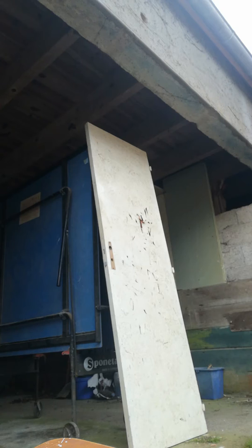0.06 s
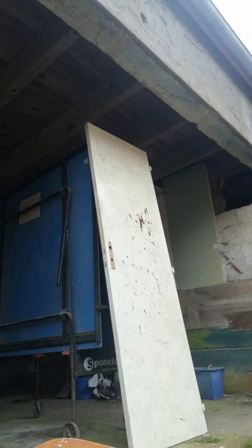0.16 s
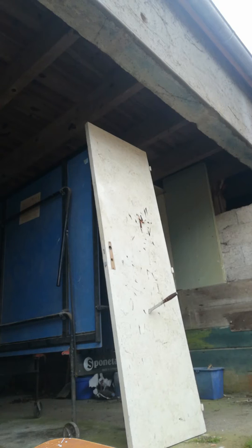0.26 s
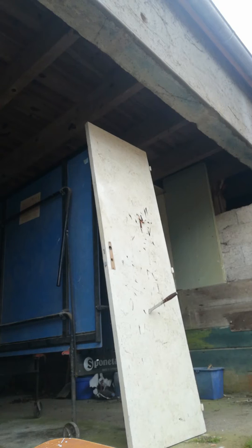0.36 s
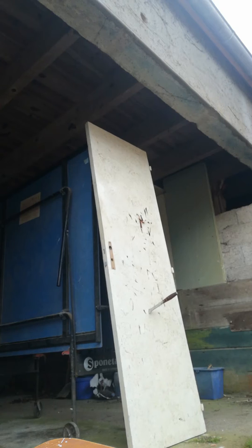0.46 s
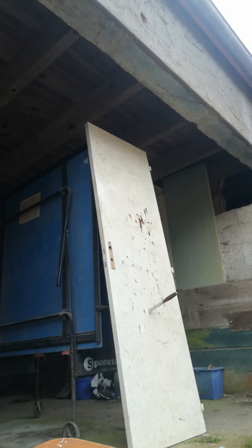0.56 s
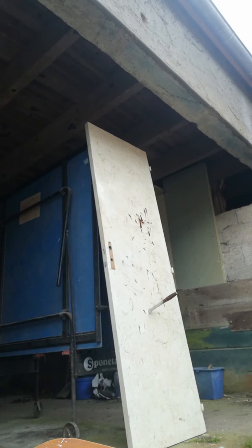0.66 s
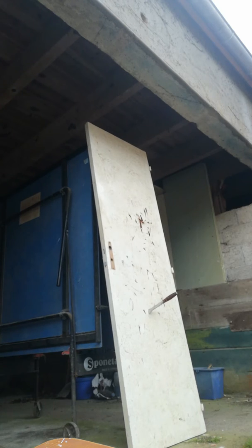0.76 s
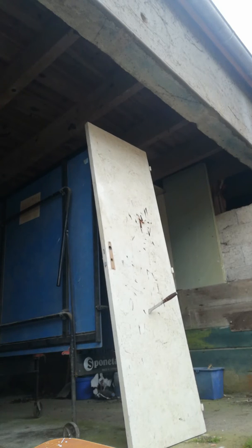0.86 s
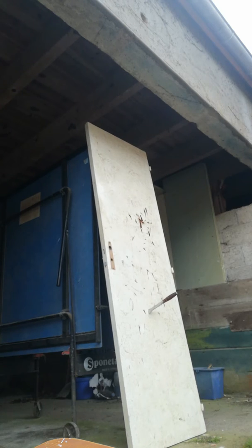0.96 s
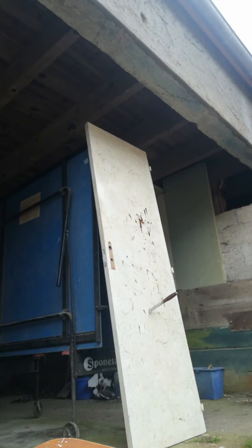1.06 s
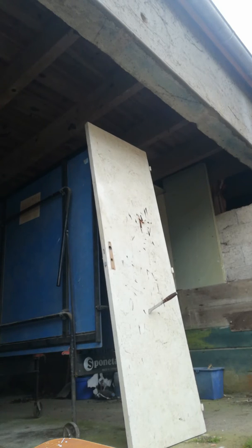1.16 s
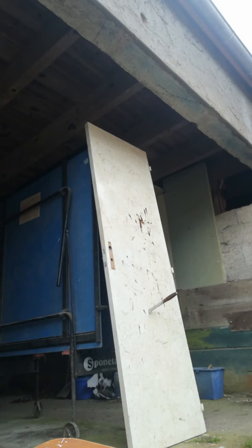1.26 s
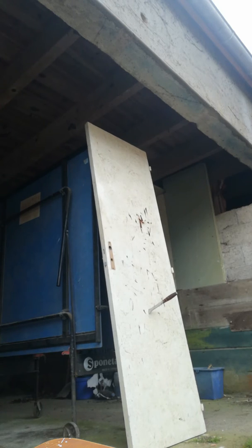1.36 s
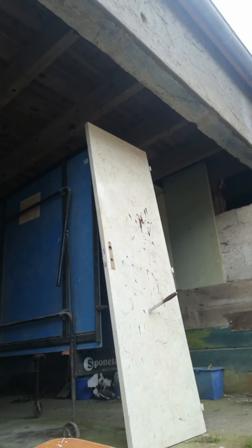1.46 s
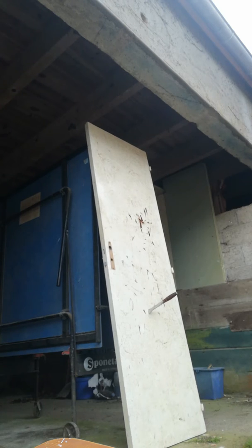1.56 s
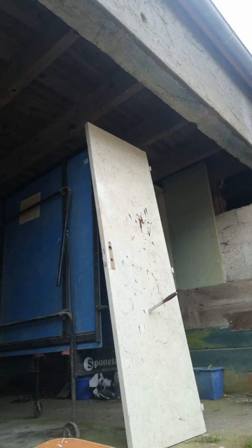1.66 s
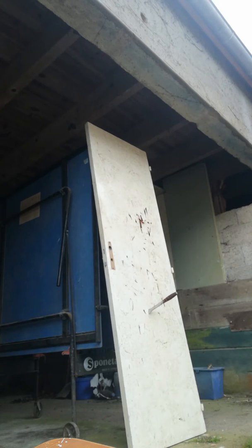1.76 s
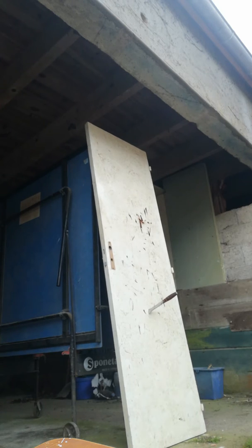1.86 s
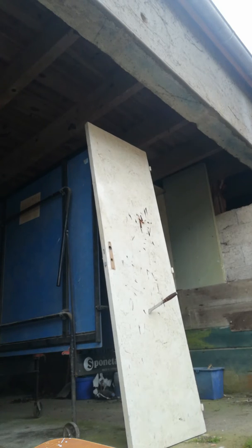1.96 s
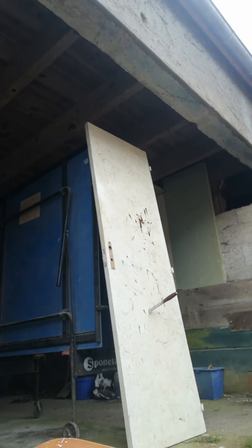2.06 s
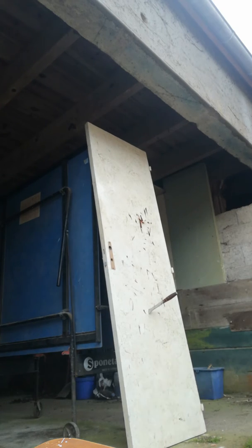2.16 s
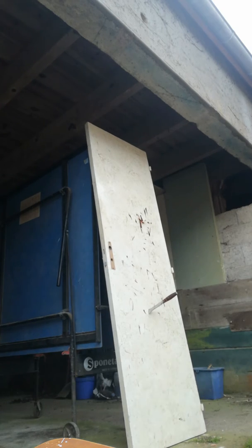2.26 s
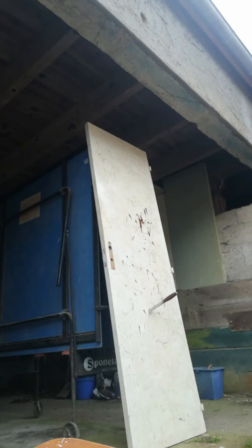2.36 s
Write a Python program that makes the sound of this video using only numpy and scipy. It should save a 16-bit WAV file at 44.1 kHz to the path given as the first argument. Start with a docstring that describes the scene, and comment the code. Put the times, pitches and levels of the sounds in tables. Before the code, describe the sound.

A thrown knife cracks into a hollow wooden door, which booms, knocks and rattles under a shed roof.

```python
"""Knife thrown into a hollow door

A knife sticks into a hollow wooden door leaning under an open shed roof: a noise-burst crack, a deep boom (one
sine with a drawn level) that throbs as the door rocks, knocks of damped modes, and a shed tail of noise dying
band by band. The thrower's sleeve, clothes and feet rustle (swelling noise) with ticks and footfalls (short
sines), the blade rings briefly, and a far engine (wavering harmonics) drones over the yard's hush (noise)."""
import sys
import numpy as np
from scipy import signal
from scipy.io import wavfile
from scipy.ndimage import uniform_filter1d

SR = 44100
rng = np.random.default_rng(int(sys.argv[2]) if len(sys.argv) > 2 else 0)


def waveform_to_disk(signal):
    """Save audio, clipped to [-1, 1], as 16-bit WAV at the path in sys.argv[1]."""
    frames = np.transpose(np.atleast_2d(signal))
    scaled = np.clip(frames, -1, 1) * 32767
    samples = np.round(scaled).astype(np.int16)
    wavfile.write(sys.argv[1], SR, samples)


N = 105840
T = np.arange(N) / SR
HIT_S = 0.2243
NEAR_PAN_DB = -7  # left minus right, ticks and blade
PANEL_SHARE = 0.59  # resonant part of the crack
KNOCK_RISE_S = 0.018

# Balance of the strike and its tail: f/Hz, left minus right/dB
STRIKE_PAN = [(150, 2.5), (400, -3.5), (700, -9), (2400, -5), (5000, 0), (14000, -17.5)]


def amp(db):
    """Amplitude factor of a level in dB."""
    return 10 ** (np.asarray(db, float) / 20)


def evened(x):
    """Scale to rms 1."""
    return x / np.sqrt(np.mean(x ** 2) + 1e-20)


def read(points, hz):
    """Interpolate a table over log frequency."""
    f, value = np.transpose(points)
    return np.interp(np.log(hz + 1), np.log(f + 1), value)


def add(mix, start_s, sound):
    """Mix a sound in at start_s, cut at the end of the scene."""
    part = mix[..., round(start_s * SR):][..., :sound.shape[-1]]
    part += sound[..., :part.shape[-1]]


def noise(spectrum, pan, size=512, patchy_db=1.5, t60=None):
    """Stereo noise from random short-time spectra, rms 1 before any decay; t60 makes each band die away."""
    # Left-right likeness: f/Hz, correlation
    likeness = [(60, 0.99), (240, 0.76), (950, 0.28), (3770, 0.083), (15000, -0.18)]
    hop = size // 4
    frames, hz = N // hop + 5, np.fft.rfftfreq(size, 1 / SR)
    a, b, c, d, patches = rng.standard_normal((frames, len(hz), 5)).T
    patches = uniform_filter1d(patches, size=size // 64, axis=0)
    patches = evened(uniform_filter1d(patches, size=10, axis=1))
    like = np.clip(read(likeness, hz), -1, 1)[:, None]
    side_db = read(pan, hz)[:, None] / 2
    left = a + 1j * b
    right = like * left + np.sqrt(1 - like ** 2) * (c + 1j * d)
    z = np.array([left * amp(side_db), right * amp(-side_db)])
    z *= amp(read(spectrum, hz)[:, None] + patchy_db * patches)
    steady = signal.istft(z, nperseg=size, noverlap=size - hop)[1]
    scale = np.sqrt(np.mean(steady.mean(0) ** 2))  # rms of the mono sum
    if t60:
        z *= amp(-60 * np.arange(frames) * hop / SR / read(t60, hz)[:, None])
    return signal.istft(z, nperseg=size, noverlap=size - hop)[1][:, :N] / scale


def ring(modes, rise_s, phases, sag_per_s=0):
    """Sum of exponentially dying sines with a soft start, sinking in pitch if sag_per_s is set."""
    t = T[:SR // 2]
    out = 0
    for (hz, db, t60_s), phase in zip(modes, phases):
        cycles = hz * t / (1 + sag_per_s * t / 2) + phase
        out = out + amp(db - 60 * t / t60_s) * np.sin(2 * np.pi * cycles)
    return (1 - np.exp(-t / rise_s)) * out


def panel(x, share=PANEL_SHARE):
    """The door's skin as parallel resonators, blended with the direct sound."""
    # Skin resonances: f/Hz, width/Hz, level/dB
    resonances = [(746, 16, -8.5), (919, 74, -7.5), (1048.5, 36, -4), (1147, 150, -3), (1600, 51, -9.5),
                  (1995, 86, -5.5), (2870, 32, -14)]
    rung = sum(amp(db) * signal.lfilter(*signal.iirpeak(hz, hz / width_hz, SR), x)
               for hz, width_hz, db in resonances)
    return (1 - share) * x + share * rung * np.std(x) / np.std(rung)


def hush():
    """Steady background of the yard: shaped noise."""
    # Spectrum: f/Hz, level/dB per Hz
    spectrum = [(20, 0.5), (70, -10.5), (289, -9.5), (630, -22), (1230, -22.5), (2140, -23.5),
                (10500, -25.5), (15400, -38.5)]
    # Balance: f/Hz, left minus right/dB
    pan = [(60, -0.5), (300, -1), (15000, -2.5)]
    return amp(-60.5) * noise(spectrum, pan, size=2048, patchy_db=.7)


def engine():
    """Far engine: multiples of a gliding base frequency, each wavering in level on its own."""
    # Course: t/s, base f/Hz, level/dB
    course = [(.2, 65.94, -68.5), (1.099, 69.1, -63), (1.449, 74.9, -66.5), (2, 77.23, -63),
              (2.251, 73.5, -66), (2.33, 64.7, -63.5)]
    # Multiples from the first up: level/dB
    order_levels = [0.5, 1, -5, -7.5]
    waver_db = 4
    s, hz, level_db = np.transpose(course)
    turns = np.cumsum(np.interp(T, s, hz)) / SR
    out = 0
    for order, db in enumerate(order_levels, 1):
        waver = evened(sum(np.sin(2 * np.pi * (f * T + rng.random())) / np.sqrt(f)
                           for f in np.geomspace(1, 12, num=10)))
        tone = np.sin(2 * np.pi * (order * turns + rng.random()))
        out = out + np.sqrt(2) * amp(db + waver_db * waver) * tone
    return out * amp(np.interp(T, s, level_db))


def rustle():
    """Sleeve, clothes and feet: grainy noise in two bands, swelling and dying with each movement."""
    # Movements: peak t/s, rise/s, t60/s, hiss level/dB, body level/dB
    movements = [(0.052, 0.025, 0.18, -42.5, -51.5), (0.092, 0.026, 1, -58, -52.5),
                 (0.177, 0.0024, 0.18, -47, -43), (.84, 0.1, 1, -59.5, -56.5),
                 (1.068, 0.037, 1, -61.5, -58.5), (1.17, 0.014, .6, -60, -64), (1.265, 0.018, 1, -58, -61),
                 (1.361, 0.097, 0.13, -68, -81), (1.848, 0.011, 0.71, -46.5, -72),
                 (1.902, 0.076, 1, -71, -56.5), (2.35, 0.053, 0.59, -69, -66.5)]
    # Hiss spectrum: f/Hz, level/dB per Hz
    hiss_spectrum = [(3000, -23.5), (4500, -3.5), (7000, -1), (8600, -5.5), (10300, 0), (13000, -10.5),
                     (15400, -33.5)]
    # Body spectrum: f/Hz, level/dB per Hz
    body_spectrum = [(400, -16), (700, -11.5), (1300, -4), (2200, -9), (3400, -3.5), (7000, -28.5)]
    # Balance: f/Hz, left minus right/dB
    pan = [(300, -6), (15000, -6.5)]
    grain_db = 1.5
    grain = amp(grain_db * evened(uniform_filter1d(rng.exponential(1, N) - 1, size=60)))
    hiss = noise(hiss_spectrum, pan, patchy_db=3.0) * grain
    body = noise(body_spectrum, pan, patchy_db=3.0) * grain
    power = np.zeros((2, N))
    for s, rise_s, t60_s, *db in movements:
        rise = np.exp(-((T - s) / rise_s) ** 2)
        decay = amp(-60 * np.maximum(T - s, 0) / t60_s)
        power += (amp(db)[:, None] * np.where(T < s, rise, decay)) ** 2
    return hiss * np.sqrt(power[0]) + body * np.sqrt(power[1])


def ticks():
    """Single ticks: a dull and a bright cluster of very short sines."""
    # Ticks: t/s, dull peak level/dB, bright peak level/dB
    events = [(0.0183, -43, -61), (0.0253, -38.5, -66), (0.047, -46, -24.5), (0.174, -33, -31),
              (1.057, -40.5, -61), (1.07, -42, -60), (1.0743, -42, -57), (1.1345, -40, -43),
              (1.156, -41, -38), (1.254, -57, -37.5), (1.2915, -38, -35.5), (1.8338, -56.5, -30),
              (1.8415, -59, -41)]
    # Dull cluster: f/Hz
    dull_tones = [2100, 3300, 4700]
    # Bright cluster: f/Hz
    bright_tones = [6200, 9300, 10600]
    rise_s, spread = .0004, .04  # time to envelope peak, relative detuning
    out, t = np.zeros((2, N)), T[:SR // 8]
    side = amp(np.array([[.5], [-.5]]) * NEAR_PAN_DB)
    detunings = rng.standard_normal((len(events), 2, len(dull_tones)))
    for (s, *dbs), ups in zip(events, detunings):
        for db, hz, up in zip(dbs, (dull_tones, bright_tones), ups):
            tones = np.sin(2 * np.pi * np.outer(hz * (1 + spread * up), t)).sum(0)
            tick = t * np.exp(-t / rise_s) * tones
            add(out, s, amp(db) * side * tick / abs(tick).max())
    return out


def blade():
    """Short blade ring as it leaves the hand: rough-edged dying modes that sink in pitch."""
    # Modes: f/Hz, level/dB, t60/s
    modes = [(2720, 0, .045), (3800, -5, .045), (6800, -8, .04)]
    start_s, level_db, rise_s, sag_per_s, roughness = .175, -26, .014, 3, .45
    out = np.zeros((2, N))
    side = amp(np.array([[.5], [-.5]]) * NEAR_PAN_DB)
    wobble = 1 + roughness * evened(uniform_filter1d(rng.standard_normal(SR // 2), size=40))
    tone = ring(modes, rise_s, rng.random(len(modes)), sag_per_s)
    add(out, start_s, amp(level_db) * side * wobble * tone)
    return out


def boom():
    """The door's lowest mode: one sine whose level throbs as the door rocks."""
    # Envelope: t/s, level/dB
    envelope = [(0.224, -26), (.24, -21), (.37, -21), (0.407, -24.5), (.432, -47), (0.458, -52),
                (0.493, -19.5), (.532, -26), (0.582, -48), (0.609, -25), (.636, -29), (0.691, -45),
                (.74, -77)]
    boom_hz = 101
    s, db = np.transpose(envelope)
    level = np.interp(T, s, amp(db), left=0, right=0)
    return np.sqrt(2) * level * np.sin(2 * np.pi * boom_hz * (T - s[0])) * np.ones((2, 1))


def crack():
    """The point splinters into the wood, then the skin slaps: two bursts of lumpy noise through the panel."""
    # Spectrum: f/Hz, level/dB per Hz
    spectrum = [(200, -36), (400, -11.5), (1100, -2), (2000, -0.5), (3700, -3), (4300, -9.5), (8000, -1.5),
                (11000, -19.5), (15400, -37.5)]
    # Bite, then slap: delay/s, hold/s, t60/s, level/dB, treble/dB
    bursts = [(0, 0.0054, 0.021, -4, 3.5), (.0098, 0.0049, 0.012, -7, -18.5)]
    splinters_per_s, splinter_db = 2500, 4.5
    rise_s, treble_from_hz = 0.0012, 1320
    out, t = np.zeros((2, N)), T[:4096]
    lumps = np.repeat(rng.standard_normal(N), round(SR / splinters_per_s))[:N]
    full = panel(noise(spectrum, STRIKE_PAN, patchy_db=3.0) * amp(splinter_db * lumps))
    dull = signal.sosfiltfilt(signal.butter(4, treble_from_hz, fs=SR, output="sos"), full)
    for k, (delay_s, hold_s, t60_s, db, treble_db) in enumerate(bursts):
        burst = dull + amp(treble_db) * (full - dull)
        burst = burst[:, (k + 1) * len(t):][:, :len(t)]  # a fresh stretch of noise each time
        burst = burst / np.std(burst[:, :400])
        decay = amp(db - 60 * np.maximum(t - hold_s, 0) / t60_s)
        add(out, HIT_S + delay_s, burst * np.minimum(t / rise_s, 1) * decay)
    return out


def shed_tail():
    """The shed's answer: noise dying band by band, lumpy as the loose skin rattles."""
    # Spectrum: f/Hz, level/dB per Hz
    spectrum = [(100, -47), (160, -3), (313, -5.5), (560, -20.5), (900, -14), (2400, -11.5), (6700, -13),
                (9500, -15), (12000, -27), (15400, -33.5)]
    # Decay: f/Hz, t60/s
    decay = [(300, 1.296), (1000, 0.89), (2500, 0.6), (6000, 0.54), (12000, 0.36)]
    level_db, rise_s, lump_db = -13.5, 0.019, 1.2
    damped_s, damped_db, damped_over_s = 0.479, -3.5, 0.041  # the first knock damps the skin
    out = np.zeros((2, N))
    tail = panel(noise(spectrum, STRIKE_PAN, patchy_db=1.42, t60=decay), PANEL_SHARE / 2)
    tail *= amp(lump_db * evened(uniform_filter1d(rng.standard_normal(N), size=250)))
    damping = amp(damped_db * np.clip((T + HIT_S - damped_s) / damped_over_s, 0, 1))
    add(out, HIT_S, amp(level_db) * (1 - np.exp(-T / rise_s)) * damping * tail)
    return out


def knocks():
    """The strike, then knocks against the prop: each rings low door modes and a band-passed noise rattle."""
    # Knocks, the strike first: t/s, thud level/dB, rattle level/dB
    events = [(0.228, -19.5, -56), (0.441, -22.5, -34), (0.522, -26, -45), (0.605, -30, -39),
              (0.631, -27, -39.5), (0.716, -29.5, -41), (0.874, -41.5, -61)]
    # Low door modes: f/Hz, level/dB, t60/s
    modes = [(65.7, 5, 0.12), (128.9, 7.5, 0.1302), (187.6, 1.5, 0.11), (289, -3, 0.066),
             (364.7, -17.5, 0.18)]
    struck_rise_s, rattle_hz, rattle_t60_s = .002, 1380, 0.15
    out, t = np.zeros((2, N)), T[:SR // 4]
    band = signal.butter(2, [rattle_hz / 2, rattle_hz * 2], "bandpass", fs=SR)
    all_phases = rng.random((len(events), len(modes)))
    for k, ((s, thud_db, rattle_db), phases) in enumerate(zip(events, all_phases)):
        if k == 0:  # the strike: faster, without the lowest listed mode
            thud = ring(modes[1:], struck_rise_s, phases)
        else:
            thud = ring(modes, KNOCK_RISE_S, phases)
        add(out, s, amp(thud_db) * thud[None])
        buzz = evened(signal.lfilter(*band, rng.standard_normal((2, len(t)))))
        buzz = buzz * amp([[-2.5], [2.5]])  # louder on the right
        swell = (1 - np.exp(-t / KNOCK_RISE_S)) * amp(rattle_db - 60 * t / rattle_t60_s)
        add(out, s, buzz * swell)
    return out


def shudder():
    """The door settling against its prop: dying low band-passed noise."""
    start_s, level_db, t60_s = 0.78, -38, 0.69
    out = np.zeros((2, N))
    band = signal.butter(2, [50, 142], "bandpass", fs=SR, output="sos")  # Hz
    rumble = evened(signal.sosfilt(band, rng.standard_normal(N)))
    swell = (1 - np.exp(-T / KNOCK_RISE_S)) * amp(level_db - 60 * T / t60_s)
    add(out, start_s, (rumble * swell)[None])
    return out


def footfalls():
    """Soft footfalls: sines that die within about a cycle."""
    # Steps: t/s, starting level/dB, f/Hz
    steps = [(1.255, -34, 326), (2.037, -41, 30.95)]
    decay_cycles = 0.52
    out, t = np.zeros((2, N)), T[:SR // 8]
    for s, db, hz in steps:
        thump = np.exp(-t * hz / decay_cycles) * np.sin(2 * np.pi * hz * t)
        add(out, s, amp(db) * thump[None])
    return out


def scene():
    """Sum of all sources."""
    yard = hush() + engine()
    thrower = rustle() + ticks() + blade() + footfalls()
    door = boom() + crack() + shed_tail() + knocks() + shudder()
    return yard + thrower + door


def record(dry):
    """Gain control ducks after loud sound and creeps back; then a soft clip and a band limit."""
    duck_from_db, duck_share, edge_hz = -23.5, 0.19, 15650
    held_fall_db_per_s = 33  # fall of the held level; the gain recovers by duck_share of it
    power_db = 10 * np.log10(abs(uniform_filter1d((dry ** 2).mean(0), size=800)) + 1e-12)
    fall_db = T * held_fall_db_per_s
    held_db = np.maximum.accumulate(power_db + fall_db) - fall_db
    over_db = np.maximum(held_db - duck_from_db, 0)
    mix = np.tanh(dry / amp(duck_share * uniform_filter1d(over_db, size=200)))
    lowpass = signal.firwin(511, edge_hz, window=("kaiser", 9), fs=SR)
    return signal.oaconvolve(mix, lowpass[None], "same")


dry = scene()
out = record(dry)
waveform_to_disk(out)
```